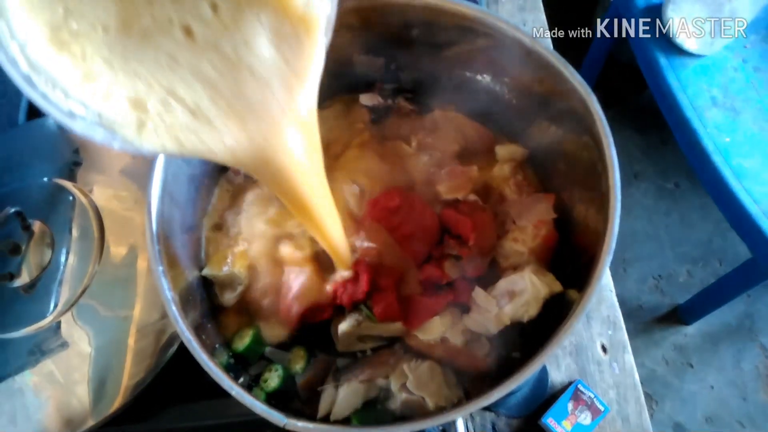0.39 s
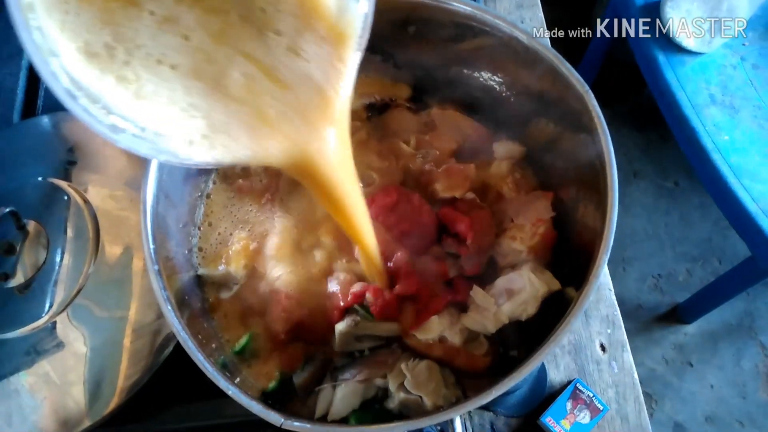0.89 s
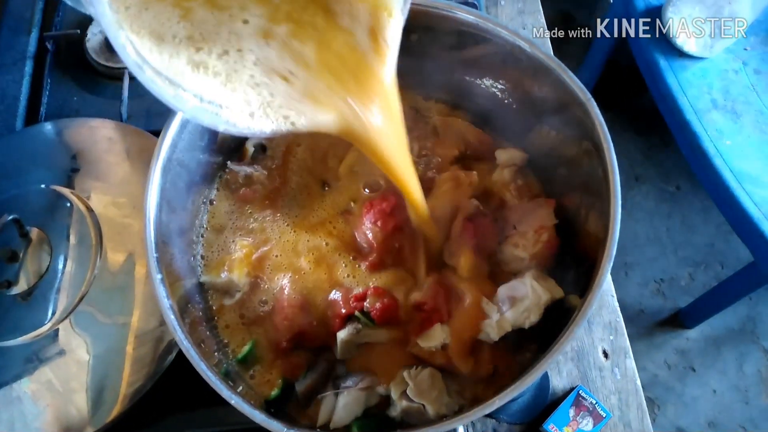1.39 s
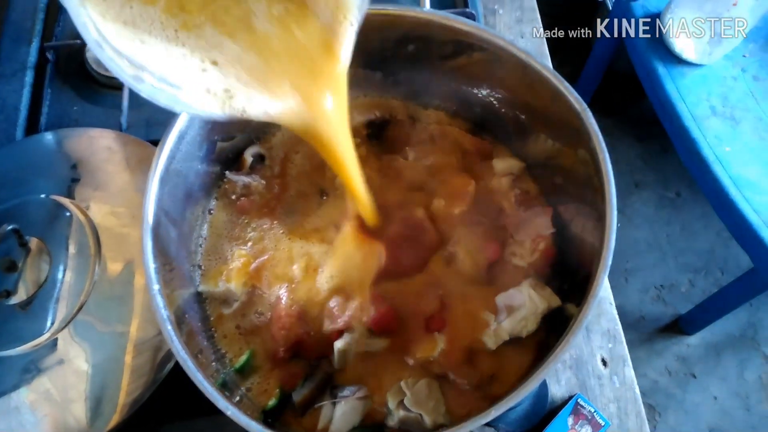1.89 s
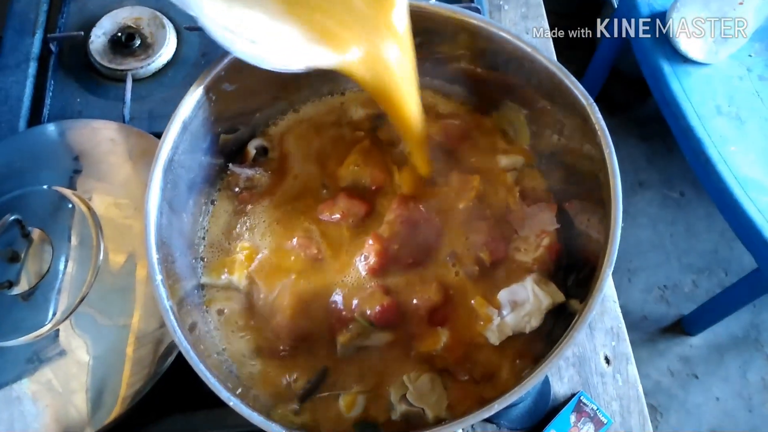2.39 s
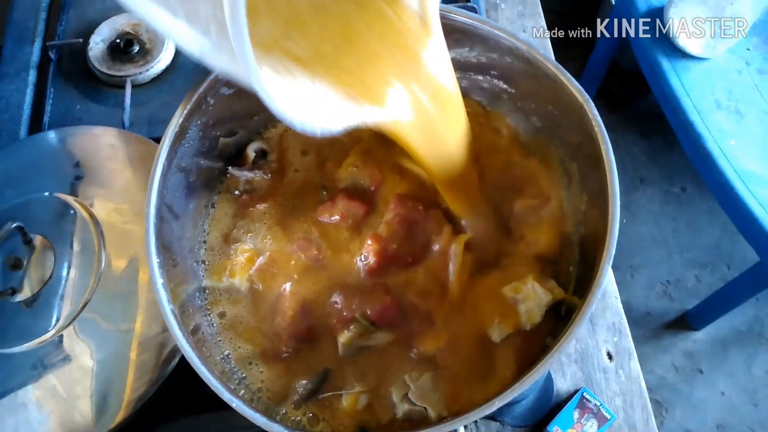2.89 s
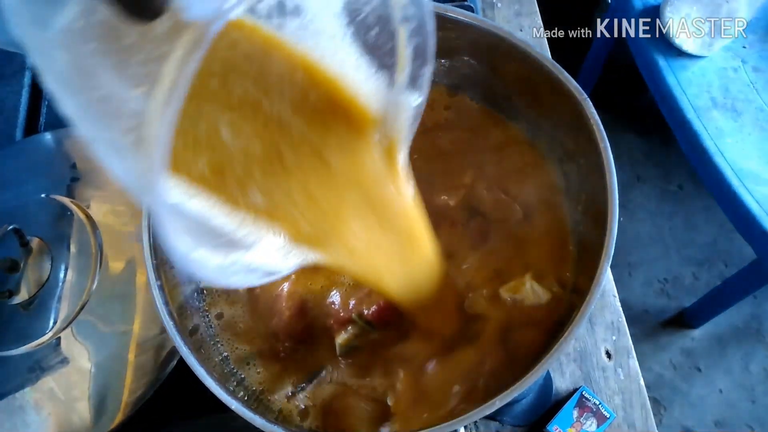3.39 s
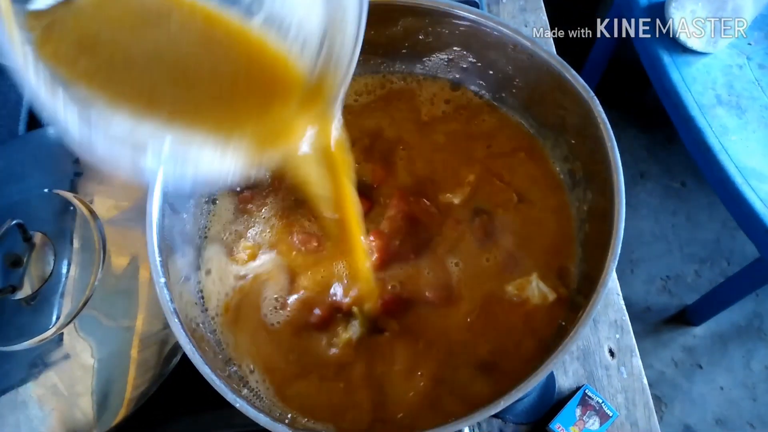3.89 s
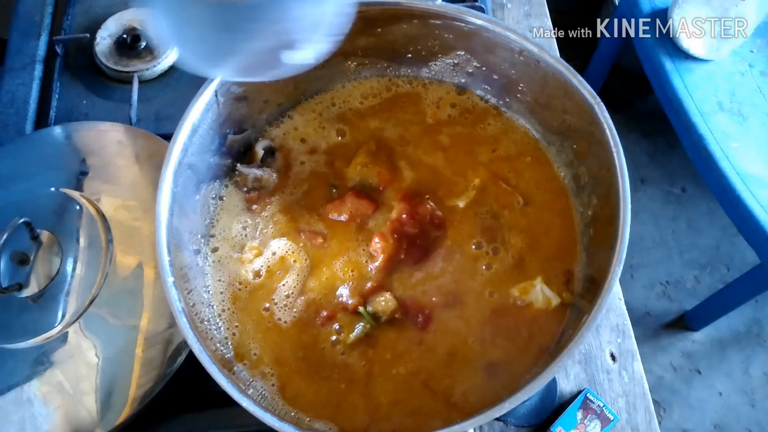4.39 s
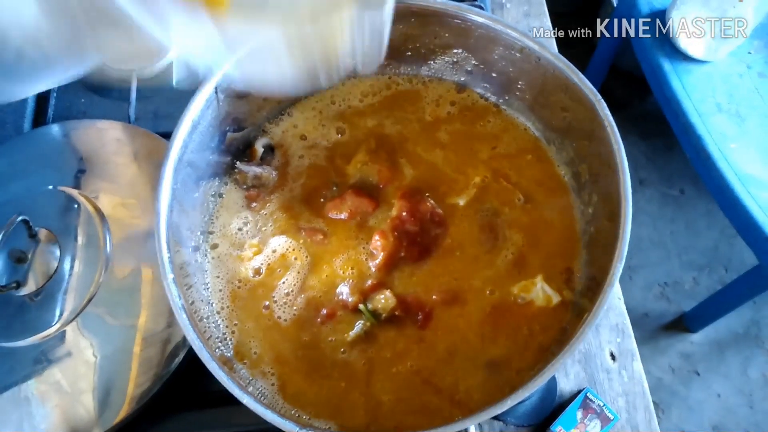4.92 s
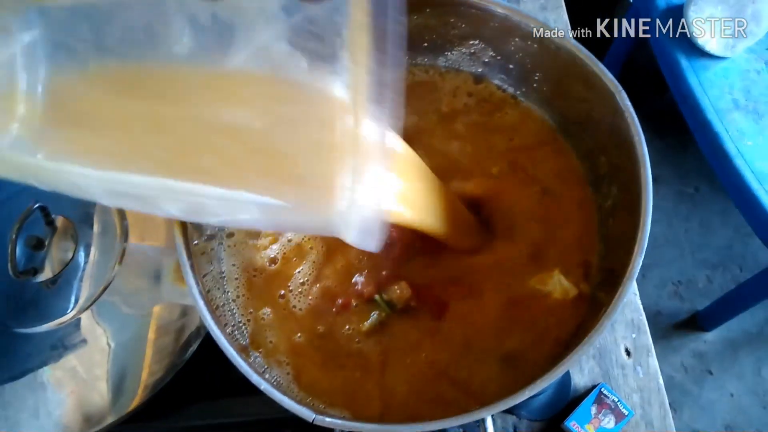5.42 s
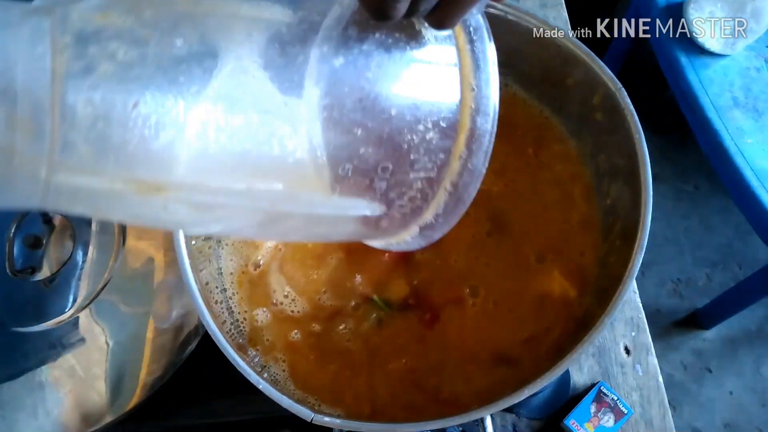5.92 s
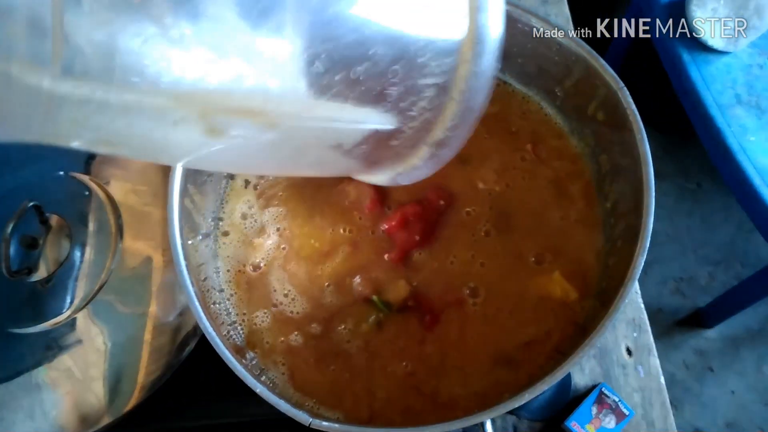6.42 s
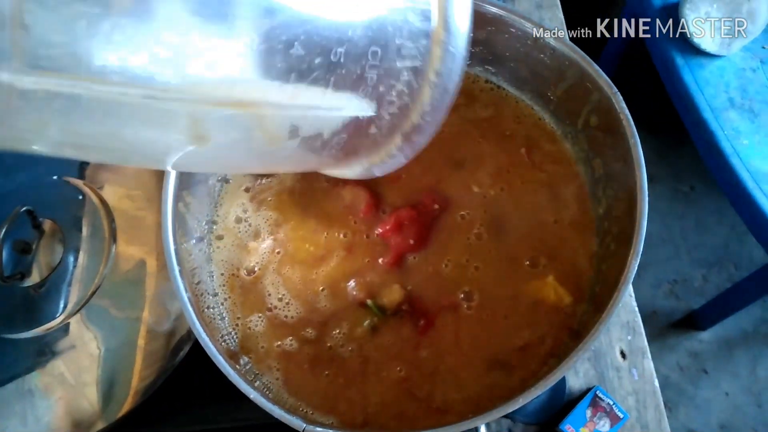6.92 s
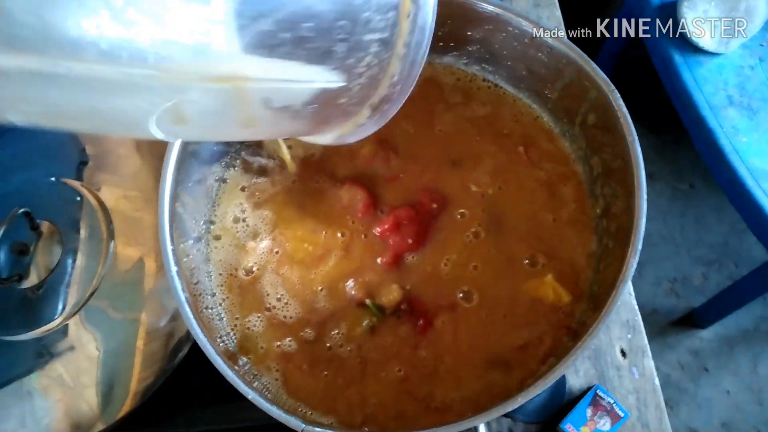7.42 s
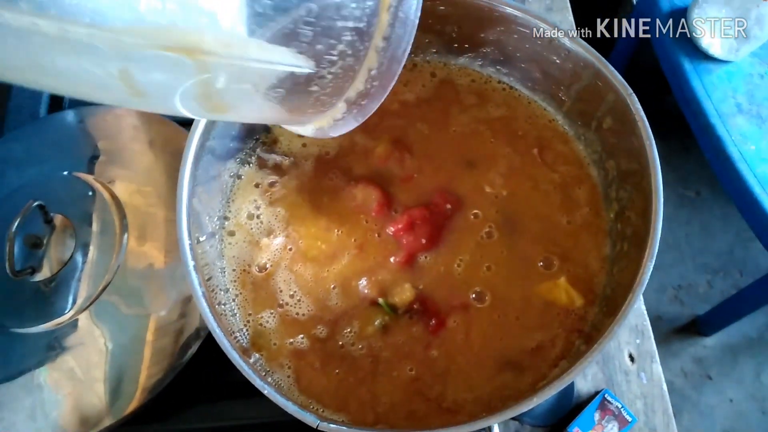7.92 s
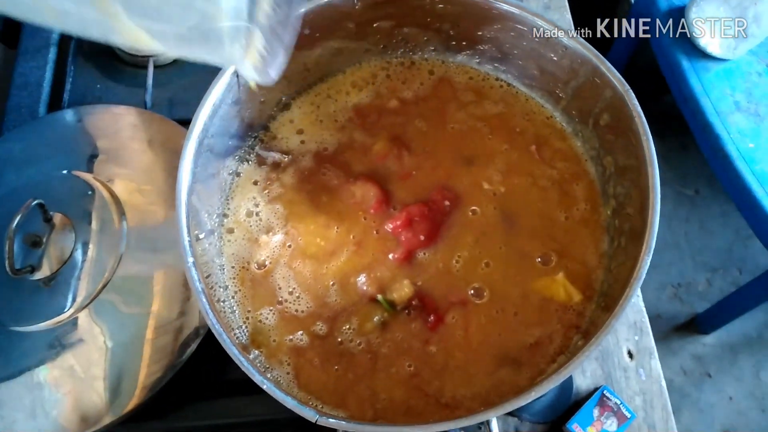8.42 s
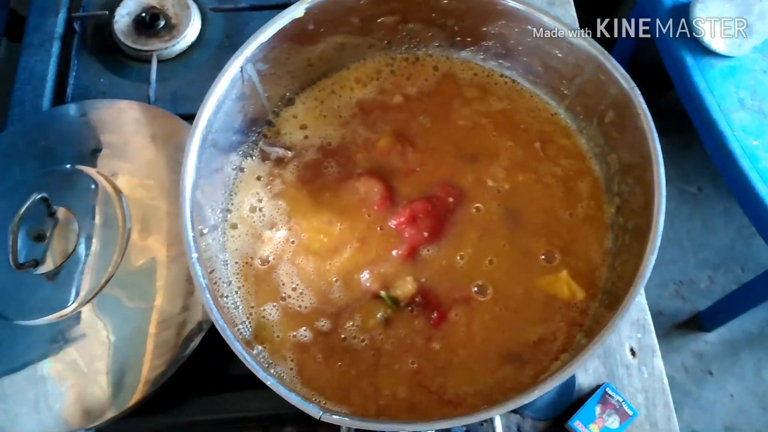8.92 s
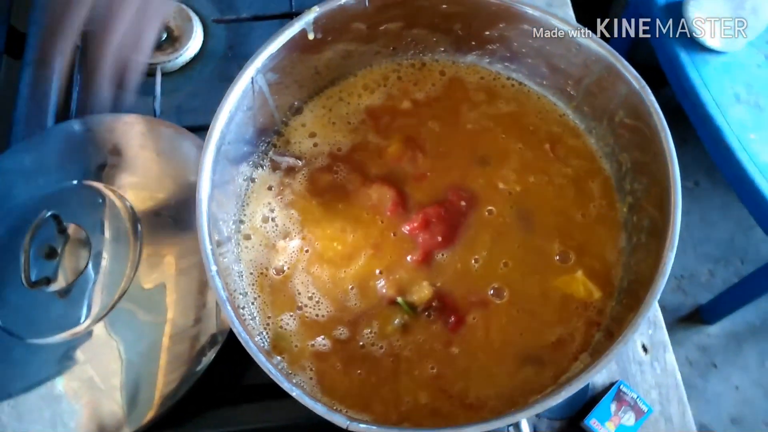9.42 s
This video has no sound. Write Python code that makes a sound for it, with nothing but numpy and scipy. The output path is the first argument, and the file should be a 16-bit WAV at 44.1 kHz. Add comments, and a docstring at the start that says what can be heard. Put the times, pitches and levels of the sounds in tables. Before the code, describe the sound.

The sound fades in almost at once on a low, uneven rumble of flame and simmer with a faint, slowly weakening hiss. From 0 to about 3.4 s thick liquid pours into a steel pot: bright patchy fizz, many sharp wet splats, small gurgles and rising bubble plops, surging and thinning. By 3.5-4.4 s only separate drips and low plops remain, one drop near 4.1 s quite sharp. After a lull, a short, strong splashing gush comes at 5.5-5.9 s. A hard knock lands at 6.1 s, the loudest crack at 6.55 s with a dull thud, then irregular hollow clacks from 7.0 to 8.4 s, echoing in the bare kitchen. A brief scrape at 8.1 s, dry rustles at 8.3-8.9 s and very faint scrapes around 9 s follow, leaving the low rumble. Close phone microphone, with noise suppression muffling the pauses.

```python
"""Over the low rumble of flame and simmer and a steady hiss, a thick batter is poured from a plastic jug
into a steel pot, twice: small bubbles fizz as short rings, drops splat, air pockets plop and gurgle.
Then hard knocks (noise cracks and ringing modes), scrapes (ringing slips) and rustles (filtered grains)
sound in the bare kitchen, whose diffuse tail is decaying noise; dull shuffles come now and then.
A phone microphone with a noise suppressor turns down every quiet band above the bass."""
import sys
import numpy as np
from scipy import signal
from scipy.fft import rfft, irfft
from scipy.io import wavfile
from scipy.ndimage import uniform_filter1d

SR = 44100
rng = np.random.default_rng(int(sys.argv[2]) if len(sys.argv) > 2 else 0)


def convert_level_to_amplitude(level_db):
    """Map a level in decibels to its linear amplitude factor."""
    exponent = np.asarray(level_db, float) / 20
    return 10 ** exponent


def wav_record(signal):
    """Record a signal, one row per channel, as 16-bit PCM in the file named by sys.argv[1]."""
    frames = np.transpose(np.atleast_2d(signal))
    bounded = np.clip(frames, -1, 1)
    # unit amplitude maps onto the largest positive 16-bit level
    quanta = np.round(bounded * 32767).astype(np.int16)
    wavfile.write(sys.argv[1], SR, quanta)


N = 421596

# the stream, one list per pour: time_s, flow_db (fizz), coarseness_db (larger drops against the fizz)
POURS = [
    [(.04, -54.5, -14), (.16, -58.5, -2.5), (.345, -49.5, -7.5), (.6, -51, -4.5), (.75, -52.5, -10),
     (.88, -56, -11), (1.01, -54.5, -11), (1.105, -65.5, -16.5), (1.2, -57, -32.5), (1.39, -54, -12),
     (1.58, -56, -47), (1.96, -62.5, -20), (2.055, -74, 2), (2.16, -74.5, -1), (2.245, -57.5, -6.5),
     (2.5, -59, -29), (2.64, -51.5, -17.5), (2.8, -50, -6.5), (2.91, -59, -16), (3.0, -53.5, -13.5),
     (3.1, -60.5, 4.5), (3.2, -58.5, -23), (3.4, -70, 0.5), (3.6, -76, 5), (3.93, -60.5, -6.5),
     (4.1, -102.5, -6.5), (4.49, -103, -2.5)],
    [(5.47, -63, 1), (5.56, -56, 0.5), (5.63, -52.5, -1), (5.74, -62.5, 5.5), (5.83, -85.5, 5),
     (5.92, -64.5, -26), (6.04, -84, 2)],
]
FULL_FLOW_DB = -50


def rms_one(x):
    """Normalisation: scale to unit root-mean-square."""
    return x / np.sqrt(np.mean(x ** 2) + 1e-20)


def in_time(rows, silent_db=-140):
    """Envelope: linear interpolation in dB of each column at every sample, silent outside the rows."""
    s, *columns = np.transpose(rows)
    return np.array([np.interp(np.arange(N) / SR, s, c, silent_db, silent_db) for c in columns])


def at_hz(points, hz):
    """Spectrum: linear interpolation on a log-frequency axis."""
    table_hz, value = np.array(points).T[:2]
    return np.interp(np.log(hz + 1), np.log(table_hz), value)


def shape(points, size, tilt_db=0):
    """Spectral shaping: gain per FFT bin, tilted by tilt_db per octave about 5 kHz."""
    hz = np.arange(size // 2 + 1) * SR / size
    return convert_level_to_amplitude(at_hz(points, hz) + tilt_db * np.log2((hz + 100) / 5000))


def coloured(points, size, tilt_db=0):
    """Coloured noise: white noise weighted by a spectrum, at unit rms."""
    spectrum = rfft(rng.standard_normal(size)) * shape(points, size, tilt_db)
    return rms_one(irfft(spectrum, size))


def drift(rate_hz):
    """Slow random modulation: noise through two equal one-pole low-passes, at unit rms."""
    hop = 40      # samples between computed values
    r = np.exp(-2 * np.pi * hop * rate_hz / SR)
    noise = rng.standard_normal(N // hop + 2002)
    slow = signal.lfilter([1], [1, -2 * r, r * r], noise)[2000:]      # the filter has settled
    return np.interp(np.arange(N) / hop, np.arange(len(slow)), rms_one(slow))


def ring(clicks, hz, t60_s):
    """Damped resonator: a unit click excites a decaying sine of height 1."""
    r, w = convert_level_to_amplitude(-60 / (t60_s * SR)), 2 * np.pi * hz / SR
    return signal.lfilter([0, np.sin(w)], [1, -2 * r * np.cos(w), r * r], clicks + 1e-18)


def add(out, s, sound):
    """Superposition: mix a short sound in at a moment."""
    i = round(s * SR)
    out[i:i + len(sound)] += sound[:N - i]


def strokes(rows, attack_s, sag_db_s, release_db_s):
    """Friction envelope: each stroke rises 25 dB over the attack, sags while held, then dies away."""
    start_s, hold_s, db = np.array(rows)[:, :3, None].transpose(1, 0, 2)
    t = np.arange(N) / SR - start_s - attack_s
    rise = np.where(t < -2 * attack_s, -140, 25 * np.minimum(t, 0) / attack_s)
    sag = sag_db_s * np.clip(t, 0, hold_s)
    release = release_db_s * np.maximum(t - hold_s, 0)
    return convert_level_to_amplitude(db + rise - sag - release)


def rumble(bubbles_per_s, bubbles_db, count=8):
    """Resonant turbulence: flame roar coloured by pot and room, with low bubble rings of the simmer."""
    # strength of flame and simmer: time_s, level_db
    swell = [(0.3, -50), (0.97, -49), (1.28, -47.5), (1.69, -51.5), (2.26, -50), (2.6, -54), (2.93, -50),
             (4.86, -51.5), (6.54, -52), (7.08, -52.5), (7.21, -50.5), (7.78, -47.5), (8.14, -53),
             (8.37, -46.5), (8.7, -52), (9.15, -48.5), (9.56, -52)]
    # resonances of pot and room: frequency_hz, density_db (per Hz)
    roar_colour = [(15, -51.5), (25, -22), (43, -13.5), (92, -1), (145, -4), (189, 1.5), (233, -9),
                   (253, -13.5), (309, 0), (343, -12), (372, -2), (430, -9), (600, -2), (780, -52),
                   (1320, -120)]
    roar = coloured(roar_colour, size=N)
    deep = signal.sosfiltfilt(signal.butter(2, 135, fs=SR, output="sos"), roar)
    out = deep * convert_level_to_amplitude(0.5 * drift(2.3)) + (roar - deep) * convert_level_to_amplitude(2.2 * drift(4.6))
    for hz in np.geomspace(160, 540, count):
        born = rng.uniform(-0.94, 1, N) * (rng.random(N) < bubbles_per_s / SR)
        out = out + convert_level_to_amplitude(bubbles_db) * rms_one(ring(ring(born, hz, 5.5 / hz), hz, 2.2 / hz))
    level_db = np.interp(np.arange(N) / SR, *np.transpose(swell))
    return convert_level_to_amplitude(level_db) * rms_one(out)


def hiss(start_db, fade_db_per_s):
    """Broadband turbulence: the hiss of gas and kitchen as coloured noise that slowly weakens."""
    # colour of the hiss: frequency_hz, density_db (per Hz)
    hiss_colour = [(300, -34.5), (600, -2), (900, -4), (1800, -7), (4000, -11.5), (6000, -8.5),
                   (9000, -7.5), (12400, -13.5), (13400, -23), (16000, -28.5)]
    return convert_level_to_amplitude(start_db - fade_db_per_s * np.arange(N) / SR) * coloured(hiss_colour, size=N)


def fizz(per_s, cycles, patchy_db, count=32):
    """Bubble resonance: tiny bubbles burst at random; each size rings a few cycles and comes in patches."""
    # finest spray at full flow, and its share of each swing in flow and coarseness
    spray_db, follows_flow, follows_coarse = -65, 1, 0.82
    fine = large = finest = 0
    for rows in POURS:
        flow_db, coarse_db = in_time(rows)
        fine = fine + convert_level_to_amplitude(flow_db)
        large = large + convert_level_to_amplitude(flow_db + coarse_db)
        swing_db = follows_flow * (flow_db - FULL_FLOW_DB) + follows_coarse * coarse_db
        finest = finest + convert_level_to_amplitude(spray_db + swing_db)
    sizes = convert_level_to_amplitude(0.93 * np.minimum(rng.exponential(1, N), 5.0)) * rng.choice([-1, 1], N)
    # a thin stream makes fewer, separate bursts
    density = convert_level_to_amplitude(0.5 * np.clip(20 * np.log10(fine) - FULL_FLOW_DB, -16, 0))
    sizes = sizes / np.sqrt(density)
    born = rng.random(N) < per_s * density * convert_level_to_amplitude(6.5 * drift(55)) / SR
    dealt, out = rng.integers(0, count, N), 0
    for k, hz in enumerate(np.geomspace(4400, 11800, count)):
        if hz < 5900:
            level = large
        elif hz < 6800:
            level = np.sqrt(large * fine)
        elif hz < 9600:
            level = fine
        elif hz < 10500:
            level = large
        else:
            level = finest
        bursts = ring(ring(sizes * born * (dealt == k), hz, cycles / hz), hz, cycles / hz)
        out = out + rms_one(bursts) * level * convert_level_to_amplitude(patchy_db * drift(2.8)) / np.sqrt(count / 3)
    return out


def gurgle(per_s, cycles, count=14):
    """Entrained-air resonance: mid-sized bubbles are dragged under where the stream plunges in."""
    # gurgles under the stream: start_s, hold_s, level_db
    plunges = [(.05, 0.5, -71.5), (.54, 0.16, -72.5), (2.71, 0.16, -63), (3.01, 0.044, -76),
               (5.46, 0.037, -62), (5.53, 0.2, -56.5), (5.89, 0.0048, -62)]
    sizes = convert_level_to_amplitude(2.4 * np.minimum(rng.exponential(1, N), 4.0)) * (rng.random(N) < per_s / SR)
    dealt, rings = rng.integers(0, count, N), 0
    for k, hz in enumerate(np.geomspace(1850, 4500, count)):
        rings = rings + np.sqrt(hz) * ring(sizes * (dealt == k), hz, cycles / hz)
    rings = signal.sosfilt(signal.butter(2, [1500, 4800], "band", fs=SR, output="sos"), rings)
    gain = strokes(plunges, attack_s=0.018, sag_db_s=-1.0, release_db_s=160.5).sum(axis=0)
    return gain * rms_one(rings)


def plops(cycles, rise):
    """Rising bubble resonance: a damped sine climbs as a larger air pocket nears the surface."""
    # air pockets in the batter: start_s, level_db, pitch_hz (at the start)
    pockets = [(0.078, -49.5, 3600), (0.16, -46.5, 3570), (0.208, -42.5, 3540), (0.255, -61, 3450),
               (0.585, -52, 870), (0.62, -54, 1330), (0.668, -52.5, 1130), (0.697, -51, 974),
               (0.906, -51.5, 2140), (1.227, -54.5, 1290), (1.326, -44, 2965), (1.325, -58, 870),
               (1.367, -57, 1000), (1.45, -47.5, 3140), (1.552, -51, 780), (1.807, -41, 4120),
               (1.857, -44.5, 4110), (1.926, -46.5, 4100), (2.098, -47, 3570), (2.102, -51.5, 2450),
               (2.155, -51.5, 796), (2.207, -41.5, 5800), (2.208, -35, 7450), (2.262, -41, 5900),
               (2.485, -48, 3600), (2.548, -44, 3600), (2.55, -46.5, 4620), (2.615, -46, 4550),
               (2.74, -45.5, 3550), (2.762, -51, 2730), (2.81, -53.5, 2310), (2.814, -50, 1620),
               (2.809, -43, 3740), (2.868, -62, 2800), (3.018, -41.5, 4200), (3.018, -44, 4770),
               (3.046, -48.5, 3000), (3.15, -40, 4800), (3.442, -51, 1120), (3.446, -53, 1610),
               (3.605, -49, 3220), (3.799, -48, 794), (3.836, -48, 784), (3.82, -50, 1940),
               (3.867, -52, 1510), (4.085, -57, 586), (4.185, -43, 557), (5.55, -52.5, 1150),
               (5.592, -41, 2290), (5.645, -56.5, 1180), (5.723, -52.5, 1200), (5.848, -43, 3360)]
    out, t = np.zeros(N), np.arange(SR // 10) / SR
    for s, level_db, hz in pockets:
        phase = 2 * np.pi * hz * t * (1 + rise * t)
        decay = convert_level_to_amplitude(level_db - 60 * t * hz / cycles)
        add(out, s, decay * np.sin(phase) * np.clip(t / 0.00082, 0, 1))
    return out


def small_splats(spread_db, spread_octaves, count=400):
    """Random impacts: lesser drops at chance moments, as strong as the flow makes them."""
    per_s, full_flow_splat_db, follows_flow, centre_hz = 29, -32, 0.27, 8200
    when, keep, size, pitch = rng.random((count, 4)).T
    flow_db = np.max([in_time(rows)[0] for rows in POURS], axis=0)[(when * N).astype(int)]
    peak_db = full_flow_splat_db + follows_flow * (flow_db - FULL_FLOW_DB) - spread_db * size
    rows = np.c_[when * N / SR, peak_db, centre_hz * 2 ** (spread_octaves * (pitch - .5))]
    return rows[(keep < per_s * N / SR / count) & (peak_db > -60)]


def splats(cycles, tick_db, tick_octaves, snap_db, scatter_s, droplets_db, count=4):
    """Liquid impact: a slap of a few cycles on a broader tick and a thin snap, amid a few droplets."""
    # the loudest drops slapping the surface: start_s, peak_db (of the slap), pitch_hz
    loud_drops = [(0.3843, -22, 7840), (0.408, -31, 8830), (0.418, -28, 8770), (0.5343, -29.5, 8200),
                  (0.5494, -33, 8840), (0.7033, -30.5, 5460), (0.7647, -35.5, 5300), (0.8116, -54, 5730),
                  (0.838, -41, 10650), (0.9646, -28.5, 7840), (0.9857, -38.5, 5500), (1.028, -25, 5720),
                  (1.057, -35, 8610), (1.1404, -30.5, 8070), (1.1558, -29, 8200), (1.2062, -36.5, 7330),
                  (1.325, -30.5, 8300), (1.327, -37.5, 4660), (1.3428, -32, 8800), (1.3544, -32, 8200),
                  (1.3694, -30, 8300), (1.4594, -22.5, 8480), (1.4878, -43, 8100), (1.4932, -30, 9070),
                  (1.508, -30, 8000), (1.5454, -33.5, 8600), (1.6148, -29, 9000), (1.6277, -39, 4730),
                  (1.6294, -32, 8580), (1.6716, -28.5, 8650), (1.705, -44, 8300), (1.757, -34.5, 7400),
                  (1.7699, -33.5, 9060), (1.7893, -40, 8900), (1.8053, -27.5, 8330), (1.8408, -32, 8600),
                  (1.8593, -31.5, 8320), (1.8894, -33, 8200), (1.9006, -33, 8180), (1.9491, -31, 7960),
                  (2.2462, -36, 7700), (2.2702, -43, 7950), (2.2958, -28.5, 6970), (2.3276, -41, 8030),
                  (2.3515, -30.5, 7330), (2.3818, -28, 6770), (2.4125, -28, 7970), (2.4803, -32, 8200),
                  (2.5915, -29.5, 6850), (2.616, -27, 8270), (2.6435, -28, 7920), (2.6839, -30, 8930),
                  (2.682, -35, 11100), (2.6935, -26, 7100), (2.7155, -27, 8200), (2.7565, -26, 8160),
                  (2.7781, -48, 8200), (2.797, -40, 5700), (2.8865, -34, 9000), (2.9217, -35, 5710),
                  (2.9859, -30, 8800), (3.0187, -25, 8660), (3.0325, -29, 8900), (3.054, -31.5, 4720),
                  (3.055, -25.5, 8020), (3.064, -28, 7000), (3.0974, -28.5, 7900), (3.098, -28, 4770),
                  (3.1918, -35, 7870), (3.2363, -33.5, 8200), (3.2712, -39.5, 7900), (3.2901, -31, 7900),
                  (3.3709, -33, 7260), (3.446, -30.5, 7500), (3.4667, -34.5, 8260), (3.6377, -36, 5860),
                  (3.8736, -37, 5580), (3.8885, -33.5, 5780), (3.89, -35.5, 9110), (3.9521, -38, 9250),
                  (4.0753, -21.5, 8200), (4.077, -39, 4410), (4.035, -47, 7000), (4.118, -42, 8100),
                  (4.1631, -35, 7590), (4.22, -44.5, 7000), (4.265, -46, 6800), (4.204, -34, 9460),
                  (4.206, -41, 12000), (4.3002, -33.5, 8000), (4.3205, -32, 7070), (4.338, -39, 12200),
                  (4.3473, -35.5, 6340), (5.4753, -21.5, 8280), (5.507, -30, 8630), (5.477, -40, 5070),
                  (5.531, -41, 4650), (5.5499, -20.5, 7900), (5.551, -28, 4330), (5.5642, -22, 9500),
                  (5.566, -25, 5070), (5.583, -36, 8200), (5.6053, -25, 7650), (5.613, -39, 11760),
                  (5.6199, -23, 9020), (5.6472, -29, 8850), (5.65, -30, 12340), (5.6871, -20, 8200),
                  (5.698, -29, 9300), (5.731, -24.5, 8620), (5.736, -28.5, 5060), (5.75, -28, 7000),
                  (5.775, -34, 10630), (5.8015, -34, 4680), (5.8257, -22, 6440), (5.916, -39, 4300),
                  (5.917, -36, 6890), (5.9242, -36.5, 5220), (5.925, -35.5, 9500), (6.006, -43, 8200),
                  (6.2505, -37.5, 9150), (6.7977, -36.5, 8440), (7.9401, -37, 9500), (8.3447, -30, 9500),
                  (8.5826, -39, 8450), (9.226, -54, 10600)]
    out, t = np.zeros(N), np.arange(SR // 100) / SR
    thin = signal.butter(2, [2600, 14500], "band", fs=SR, output="sos")
    for s, peak_db, hz in [*loud_drops, *small_splats(spread_db=14.0, spread_octaves=0.2)]:
        edges = [hz / 2 ** tick_octaves, min(hz * 2 ** (0.95 * tick_octaves), .4 * SR)]
        band = signal.butter(2, edges, "band", fs=SR, output="sos")
        noise = rng.standard_normal(len(t))
        tone = np.sin(2 * np.pi * hz * t) * convert_level_to_amplitude(-60 * t * hz / cycles) * np.clip(t / 0.00014, 0, 1)
        slap = signal.sosfilt(band, tone + noise * convert_level_to_amplitude(tick_db - 60 * t / 0.0052))
        slap = slap / np.abs(slap).max()
        snap = signal.sosfilt(thin, noise * convert_level_to_amplitude(snap_db - 60 * t / 0.003))
        add(out, s, convert_level_to_amplitude(peak_db) * (slap + snap))
        for lag, size in rng.random((count, 2)):
            droplet = convert_level_to_amplitude(peak_db + droplets_db - 4.8 * size) * slap
            add(out, max(s + scatter_s * (lag - .12), 0), droplet)
    return out


def shuffles(lumpy_db):
    """Low-frequency friction: dull lumpy noise as something heavy shifts on wood."""
    # dull shuffles: start_s, hold_s, level_db
    shifts = [(1.3, 0.11, -55), (4.07, 0.011, -59.5), (6.55, 0.025, -37.5), (7.06, 0.049, -42.5),
              (7.18, 0.022, -48.5), (8.17, 0.043, -58), (8.94, 0.23, -54.5)]
    # their colour: frequency_hz, density_db (per Hz)
    dull_colour = [(59, -26.5), (100, -5.5), (200, -7.5), (300, -7), (430, -5), (570, -11.5), (700, -6.5),
                   (900, -16.5), (2000, -25.5), (2600, -59), (4400, -120)]
    gain = strokes(shifts, attack_s=0.015, sag_db_s=2, release_db_s=83.0).sum(axis=0)
    return gain * coloured(dull_colour, size=N) * convert_level_to_amplitude(lumpy_db * drift(21))


def knocks(rise_s, hold_s, crack_t60, clack_db, clack_octaves, detune, rattle, size=2048):
    """Modal impact: a dense crack coloured by hollow rings excites body modes; a pulse feeds the room."""
    # knocks: start_s, level_db, clack_hz, tilt_db (per octave), body_db and room_db (against level_db)
    blows = [(6.1354, -14.5, 3970, 1.5, -30, -7.5), (6.5461, -4.5, 7500, 2.5, -26.5, -8),
             (7.0332, -18.5, 5220, -0.5, -18.5, -1.5), (7.094, -33.5, 447, -1, -15.5, 6.5),
             (7.212, -29, 6120, -1.5, -33, 0.5), (7.479, -15, 5600, 1, -24, -4.5),
             (7.6252, -16, 3620, 0, -31, -6.5), (7.843, -26.5, 3000, -2, -14, 3),
             (8.0134, -21.5, 3000, 0.5, -29.5, -4), (8.3677, -20, 8270, 0.5, -30.5, -3.5)]
    # the crack close by: frequency_hz, density_db (per Hz)
    crack_colour = [(180, -43), (300, 12.5), (678, -13), (1970, -14.5), (3640, -5.5), (6850, -8),
                    (7440, -6), (9710, -15), (11100, -15.5), (13000, -26), (15000, -38), (16300, -52.5)]
    # what the knocks ring with: frequency_hz, level_db, t60_s
    modes = np.array([(90, -4.5, .06), (120, 2, 0.031), (305, -12.5, 0.095), (356.2, 1, 0.095),
                      (574.5, 1, 0.13), (1334, -15.5, 0.098), (1320, -2.5, 0.11), (1905, -11.5, 0.033),
                      (2043, -1.5, 0.073), (3600, -1.5, 0.043), (3950, 2, 0.035), (7500, -11.5, 0.01984)])
    # a knock as the room returns it: frequency_hz, density_db (per Hz)
    far_colour = [(47, -45.5), (80, -0.5), (250, -14.5), (290, -7.5), (400, -4.5), (700, -6), (1050, -17),
                  (1330, -18), (1650, -23.5), (2000, -17), (3300, -17.5), (3950, -13), (4600, -19.5),
                  (7700, -18.5), (11000, -29), (16000, -53)]
    # short hollow rings that colour every crack: frequency_hz, width_hz, lift_db
    hollow_rings = [(1280, 76, 0.5), (1940, 150, 4), (2602, 400, 7.5), (3600, 440, 3.5), (3840, 250, 8.5),
                    (5210, 200, 9), (5720, 270, 4), (6330, 190, 5.5), (7000, 170, 0), (7580, 200, 5),
                    (8300, 180, 10.5), (9500, 250, 7), (10600, 460, 8)]
    near, far, t = np.zeros(N), np.zeros(N), np.arange(size) / SR
    long_t, hz = np.arange(SR // 5) / SR, np.arange(size // 2 + 1) * SR / size + 1
    centre, width, lift_db = np.array(hollow_rings).T[:, :, None]
    for s, level_db, clack_hz, tilt_db, body_db, room_db in blows:
        clack = clack_db / (1 + (np.log2(hz / clack_hz) / clack_octaves) ** 2)
        lifts = lift_db + rng.normal(0, 2, lift_db.shape)
        hollow = np.sum(lifts / (1 + (2 * (hz - centre) / width) ** 2), axis=0)
        crack = rfft(coloured(crack_colour, size, tilt_db)) * convert_level_to_amplitude(clack + hollow)
        crack = rms_one(irfft(crack, size)) * np.clip(t / rise_s, 0, 1)
        # the 8.5 dB leave room for the peaks above the rms
        crack = crack * convert_level_to_amplitude(-60 * np.maximum(t - hold_s, 0) / crack_t60 - 8.5)

        # every knock strikes the modes with new strengths
        strength = convert_level_to_amplitude(modes[:, 1] + body_db + rng.normal(0, 3, len(modes)))
        # the grip shifts each ring a little
        pitch = modes[:, :1] * (1 + detune * rng.standard_normal((len(modes), 1)))
        walk = np.cumsum(rng.standard_normal((len(modes), len(long_t))), axis=1)
        waver = walk * rattle * modes[:, :1] / SR
        rings = np.sin(2 * np.pi * pitch * long_t + waver) * convert_level_to_amplitude(-60 * long_t / modes[:, 2:])
        body = strength @ rings * np.clip(long_t / rise_s, 0, 1)

        pulse = irfft(shape(far_colour, size, tilt_db) * convert_level_to_amplitude(0.3 * clack), size)
        pulse = np.roll(pulse, size // 8)[:size // 4]      # symmetric, centred on the knock
        pulse = pulse / np.sqrt(np.sum(pulse ** 2))
        add(near, s, convert_level_to_amplitude(level_db) * crack)
        add(near, s, convert_level_to_amplitude(level_db) * body)
        add(far, s, convert_level_to_amplitude(level_db - 21.5) * body)
        add(far, s - size / 8 / SR, convert_level_to_amplitude(level_db + room_db) * pulse)
    return near, far


def scrapes(per_s):
    """Stick-slip excitation: dense random slips ring the resonances of what is rubbed."""
    # three scrapes: start_s, hold_s, level_db
    rubs = [(8.134, 0.14, -55), (9.003, 0.035, -64.5), (9.129, 0.08, -66.5)]
    # resonances, one list per scrape: frequency_hz, width_hz, level_db
    rubbed_peaks = [
        [(1480, 450, 0), (2080, 400, 4), (2850, 340, 1), (3330, 300, -10), (4010, 500, 2), (4880, 420, -3),
         (3000, 4900, 2)],
        [(1716, 110, -3), (1915, 90, 1.5), (3060, 94, -1)],
        [(1510, 170, -4), (1705, 100, 3), (1939, 83, -1.5), (3020, 91, -10)],
    ]
    slips, out = rng.standard_normal(N) * (rng.random(N) < per_s / SR), 0
    gains = strokes(rubs, attack_s=0.054, sag_db_s=43.5, release_db_s=207.5)
    for gain, peaks in zip(gains, rubbed_peaks):
        rings = 0
        for hz, width, db in peaks:
            resonance = rms_one(ring(ring(slips, hz, 1.2 / width), hz, 1.2 / width))
            rings = rings + convert_level_to_amplitude(db + 3.2 * drift(28)) * resonance
        out = out + gain * rms_one(rings) * convert_level_to_amplitude(1.9 * drift(30))
    return out


def rustles(per_s, octaves, top_hz, echo_s, echo):
    """Comb filtering: dense dry crackle is thrown back by hard surfaces close by, striping its colour."""
    # dry rustles: start_s, hold_s, level_db, centre_hz
    crackles = [(8.295, 0.021, -45.5, 8900), (8.655, 0.036, -51, 6900), (8.452, 0.18, -59.5, 4200),
                (8.655, 0.072, -59.5, 4700), (8.879, 0.061, -54, 8000)]
    sizes = rng.standard_normal(N) * convert_level_to_amplitude(2.6 * rng.exponential(1, N))
    grains = sizes * (rng.random(N) < per_s / SR)
    grains = grains + echo * sum(np.roll(grains, round(s * SR)) for s in echo_s)
    grains = signal.sosfilt(signal.butter(6, top_hz, fs=SR, output="sos"), grains)
    out = 0
    gains = strokes(crackles, attack_s=0.036, sag_db_s=49.0, release_db_s=258.5)
    for gain, (*_, hz) in zip(gains, crackles):
        edges = [hz / 2 ** octaves, min(hz * 2 ** octaves, .45 * SR)]
        band = signal.butter(2, edges, "band", fs=SR, output="sos")
        out = out + gain * rms_one(signal.sosfilt(band, grains))
    return out


def kitchen(x):
    """Diffuse reverberation: convolution with bands of noise that die at their own rate."""
    # reverberation of the bare kitchen: frequency_hz, t60_s
    decay_times = [(150, 1), (500, 0.53), (1000, 0.53), (2000, 0.66), (4000, 0.46), (8000, .48),
                   (12000, .4)]
    t, tail = np.arange(SR) / SR, 0
    for hz in 125 * 2.0 ** np.arange(7):
        upper_hz = hz * 2 ** .5 * (1 + (hz > 6000) * .5)      # the top band reaches higher
        band = signal.butter(2, [hz / 2 ** .5, upper_hz], "band", fs=SR, output="sos")
        noise = signal.sosfilt(band, rng.standard_normal(SR))
        tail = tail + noise * convert_level_to_amplitude(-60 * t / at_hz(decay_times, hz))
    tail = tail * np.clip(t / 0.0062, 0, 1)      # reflections build up
    return signal.fftconvolve(x, tail / np.sqrt(np.sum(tail ** 2)))[:N]


def scene():
    """Superposition of direct sound, reverberation and steady noise at the microphone."""
    steady = rumble(bubbles_per_s=9.0, bubbles_db=-17.0) + hiss(start_db=-57.5, fade_db_per_s=0.7452)
    pour = fizz(per_s=3800, cycles=40, patchy_db=3.5)
    pour = pour + gurgle(per_s=1000, cycles=22.0) + plops(cycles=47.0, rise=2.0)
    pour = pour + splats(cycles=13.1, tick_db=-21.5, tick_octaves=0.39, snap_db=-19.5,
                         scatter_s=0.0072, droplets_db=-5.5)
    near, far = knocks(rise_s=0.0018, hold_s=0.0039, crack_t60=0.02, clack_db=8.5, clack_octaves=0.28,
                       detune=0.019, rattle=1.9)
    rub = shuffles(lumpy_db=-0.5) + scrapes(per_s=2600)
    rub = rub + rustles(per_s=4500, octaves=0.5, top_hz=13200, echo_s=(.0014, .0023), echo=0.14)
    to_room = convert_level_to_amplitude(12.5) * far + convert_level_to_amplitude(-10.0) * pour + convert_level_to_amplitude(-6.0) * rub
    return (near + pour + rub + kitchen(to_room) + steady)[None]


def suppressor(x, margin_db, knee_db, depth_db, release_db_s, memory_db, from_hz):
    """Spectral gating: a band opens above its own quiet level, holds as its memory sinks, then shuts."""
    hz, s, z = signal.stft(x, SR, nperseg=640, noverlap=480)
    power = uniform_filter1d(np.abs(z) ** 2, size=7, axis=1, origin=2)
    level = 10 * np.log10(power + 1e-20)
    quiet = np.percentile(level, 15, axis=1, keepdims=True)
    quiet = uniform_filter1d(quiet, size=3, axis=0)
    above = np.minimum(level - quiet, margin_db + memory_db)
    held = np.maximum.accumulate(above + release_db_s * s, axis=1) - release_db_s * s
    shut = 1 / (1 + np.exp((held - margin_db) / knee_db))
    shut = shut / (1 + (from_hz / (hz[:, None] + 1)) ** 6.44)      # the bass is left alone
    return signal.istft(z * convert_level_to_amplitude(depth_db * shut), SR, nperseg=640, noverlap=480)[1][:N]


def low_pass(x):
    """Removes everything above the highest recorded frequency."""
    return signal.sosfilt(signal.butter(12, 16550, fs=SR, output="sos"), x)


def record(dry):
    """Transduction: a small microphone loses deep bass and rounds peaks; suppressor; the input wakes up."""
    wake_s, wake_rise_s = .045, .06
    x = signal.sosfilt(signal.butter(2, 55, "high", fs=SR, output="sos"), dry[0])
    x = 0.6 * np.tanh(x / 0.6)
    x = suppressor(x, margin_db=11.5, knee_db=1.58, depth_db=-20.0, release_db_s=84.5,
                   memory_db=10.0, from_hz=640)
    x = x * np.clip((np.arange(N) / SR - wake_s) / wake_rise_s, 0, 1)
    return low_pass(x[None])


dry = scene()
out = record(dry)
wav_record(out)
```